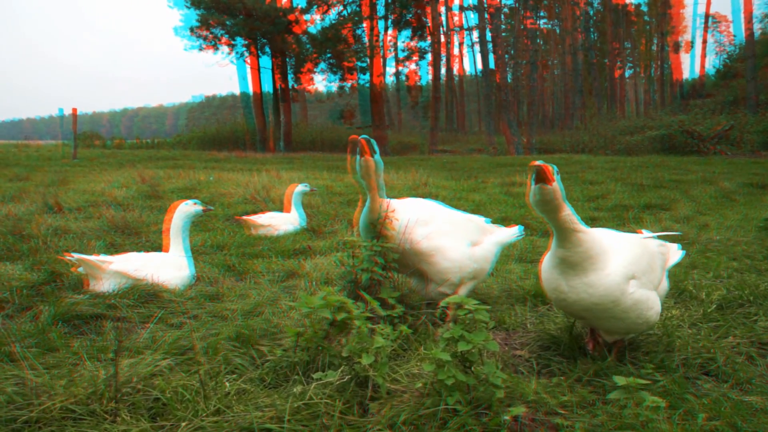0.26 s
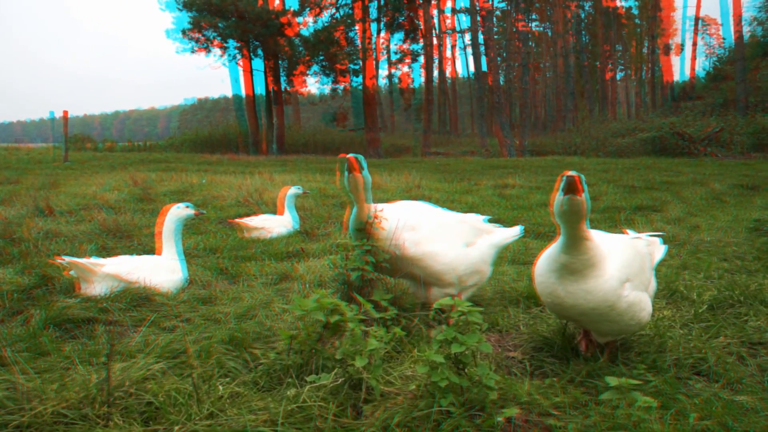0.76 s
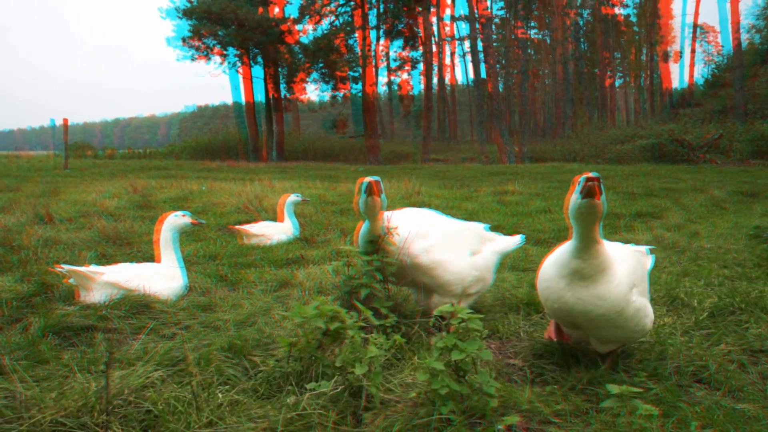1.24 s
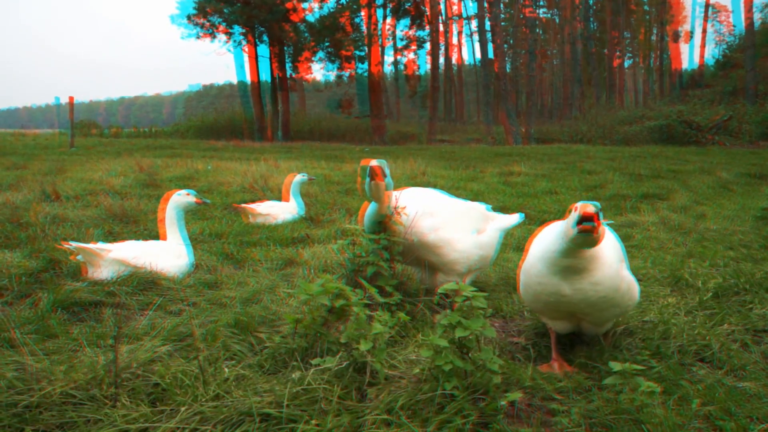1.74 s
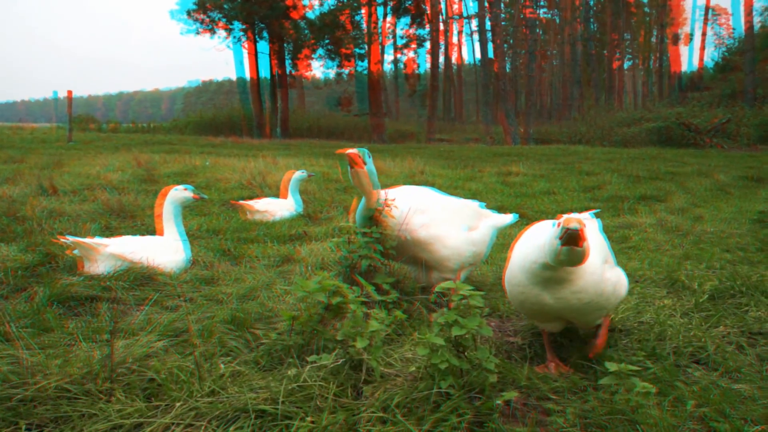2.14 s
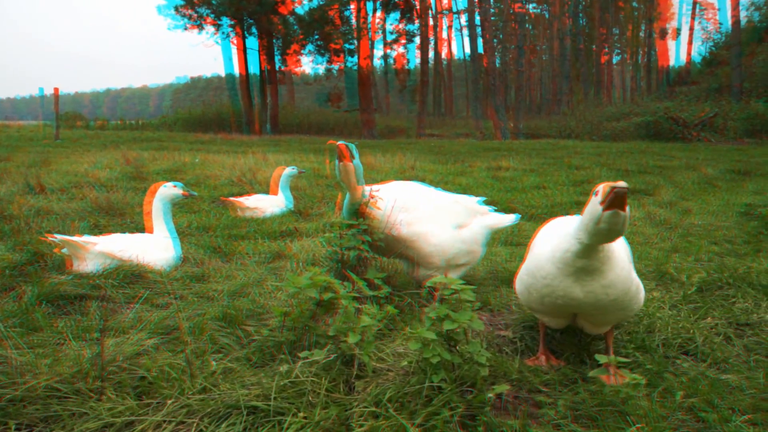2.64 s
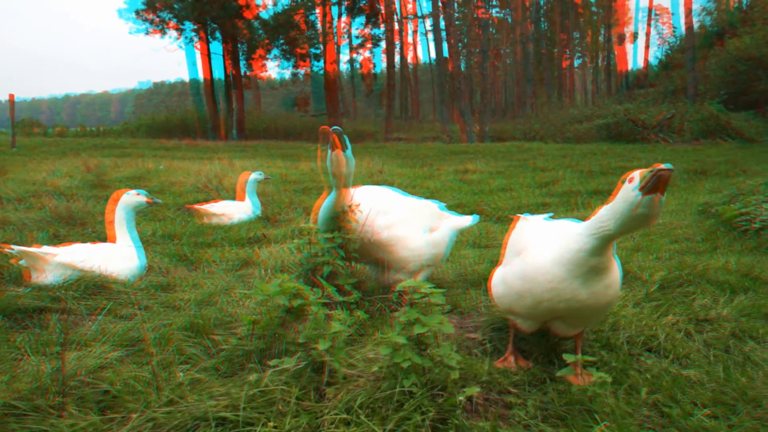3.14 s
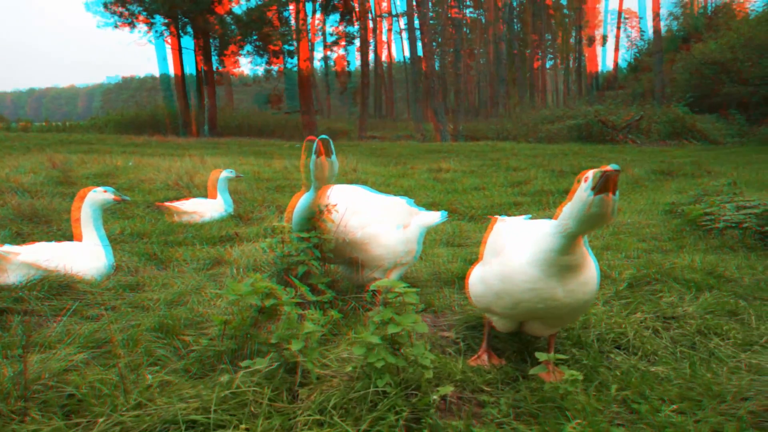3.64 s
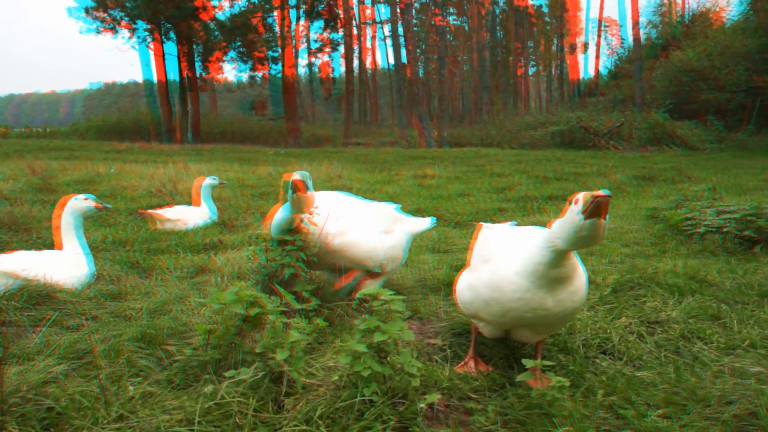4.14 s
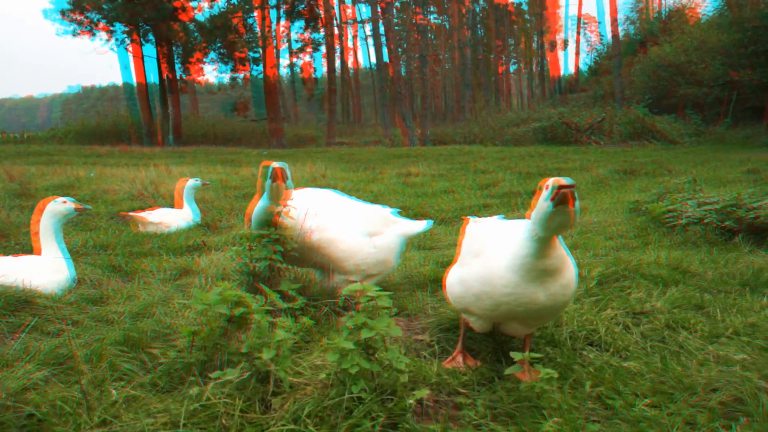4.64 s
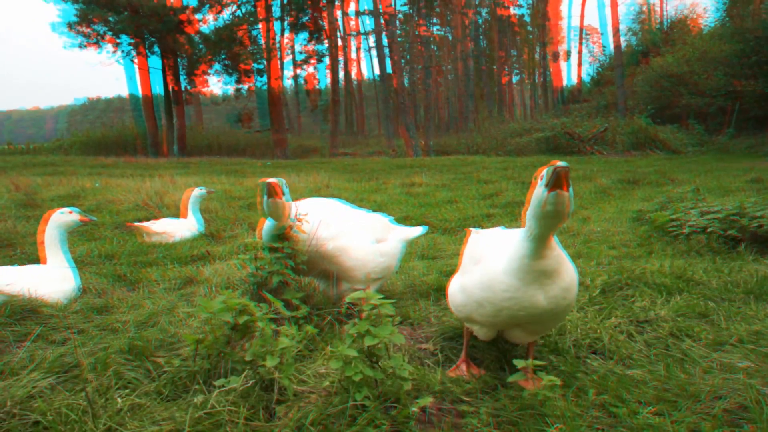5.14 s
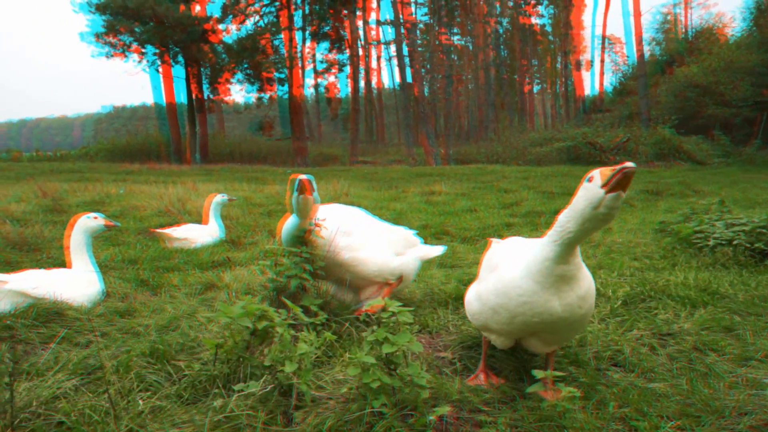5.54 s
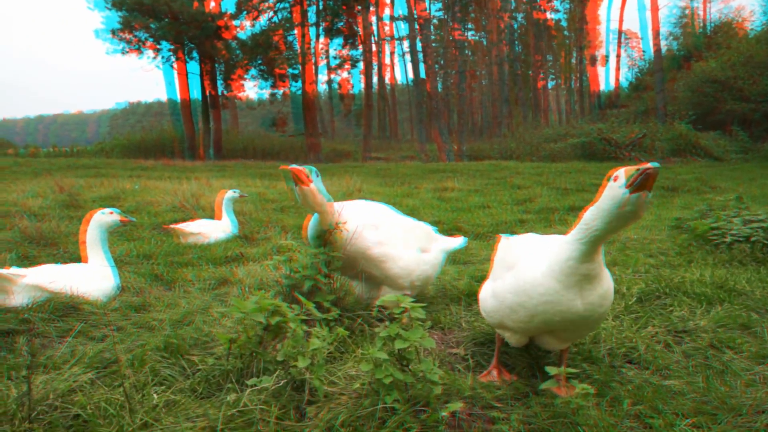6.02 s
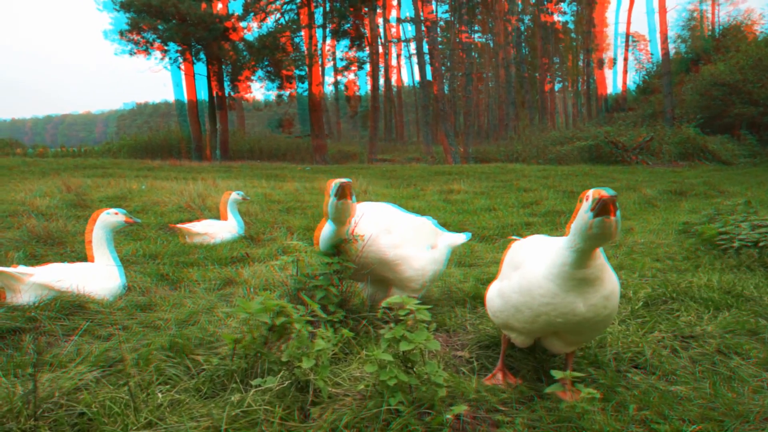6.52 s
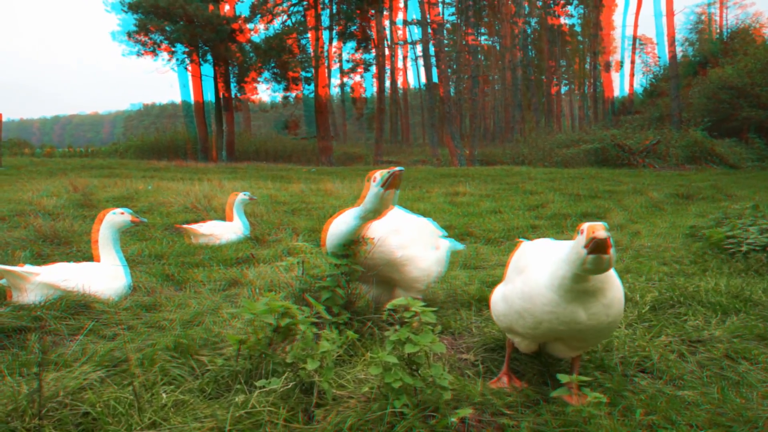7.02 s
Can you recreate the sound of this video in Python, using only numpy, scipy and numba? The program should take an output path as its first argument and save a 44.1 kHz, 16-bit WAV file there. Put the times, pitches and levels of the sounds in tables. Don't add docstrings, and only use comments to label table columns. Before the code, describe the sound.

A lone bark, a quiet spell with faint far geese, then rapid raspy goose cackles, a lull cut to silence, and more honking.

```python
import sys
import numpy as np
from scipy import signal
from scipy.fft import rfft, irfft, next_fast_len
from scipy.io import wavfile
from scipy.ndimage import uniform_filter1d
from numba import njit

SR = 44100
rng = np.random.default_rng(int(sys.argv[2]) if len(sys.argv) > 2 else 0)


def amplitude_ratio(level_db):
    exponent = np.asarray(level_db, float) / 20
    return 10 ** exponent


def to_wav(sig):
    pcm = np.clip(np.atleast_2d(sig), -1, 1) * 32767
    pcm = np.round(pcm).astype(np.int16)
    wavfile.write(sys.argv[1], SR, pcm.T)


N = 320607

# frequency in Hz, level in dB.
TRUMPET_COLOUR = [(350, -20.5), (950, -4), (1500, -14), (2000, -20.5), (2800, -19), (3400, -28.5),
                  (4100, -22.5), (5000, -37), (12000, -58.5)]


def filtered(x, order, hz, kind="low", rate=SR):
    return signal.sosfilt(signal.butter(order, hz, kind, fs=rate, output="sos"), x)


def tone(x, points):
    size = next_fast_len(N)
    hz, db = np.transpose(points)
    bins_hz = np.arange(size // 2 + 1) * SR / size
    gain_db = np.interp(np.log(bins_hz + 1), np.log(hz), db)
    return irfft(rfft(x, size) * amplitude_ratio(gain_db), size)[..., :N]


def in_time(rows):
    s, *columns = np.transpose(rows)
    return [np.interp(np.arange(N) / SR, np.maximum.accumulate(s), c) for c in columns]


def flutter(hz):
    slow = filtered(rng.standard_normal(N), 2, hz)
    return slow / slow.std()


def pan(x, db):
    return np.array([x * amplitude_ratio(db / 2), x * amplitude_ratio(-db / 2)])


@njit
def throat(source, modes, opening, reach_hz, strength, stiff):
    out = np.zeros(len(source))
    for k in range(len(modes)):
        hz, width_hz, gain = modes[k]
        r, y1, y2, c = np.exp(-np.pi * width_hz / SR), 0., 0., 0.
        shift = min(1., reach_hz / hz) ** stiff * (hz > 600)
        for i in range(2, len(source)):
            if i % 32 == 2:
                c = 2 * r * np.cos(2 * np.pi * hz * opening[i] ** shift / SR)
            y1, y2 = (1 - r * r) / 2 * (source[i] - source[i - 2]) + c * y1 - r * r * y2, y1
            out[i] += (-1) ** k * gain * strength[k, i // 32] * y1
    return out


def voice(level_db, pitch, opening, rough, modes, hum_db, hiss, cut_hz, airy=0.28, steep=0.14, stiff=0.96):
    cycles = np.cumsum(pitch) / SR
    uneven = cycles + .05 * rough * flutter(150)
    slaps = np.diff(np.floor(np.maximum.accumulate(uneven)), prepend=0)
    slaps = slaps * amplitude_ratio(4 * rough * flutter(200))
    slaps = signal.lfilter([.55], [1, -.45], slaps)

    breath = rng.standard_normal(N) * np.exp(-3.0 * (uneven % 1))
    jet = filtered(breath, 2, 3600, "high")
    jet *= amplitude_ratio(0.76 * np.clip(level_db + 22.5, -25, 5) + 1.5 * flutter(20))
    jet *= amplitude_ratio(1.2 * flutter(900))
    source = slaps + airy * rough * breath + hiss * jet

    rows = np.array([(hz, width, amplitude_ratio(db)) for hz, width, db in modes])
    on = level_db > -79
    turning = filtered(rng.standard_normal((len(rows), N // 32 + 1)), 2, 12, rate=SR / 32)
    strength = amplitude_ratio(1.8 * turning / turning.std())
    sound = throat(source[on], rows, opening[on], 1200.0, strength, stiff)
    sound = filtered(sound, 6, cut_hz, "high")

    dull = filtered(sound, 2, 3200)
    sound = dull + (sound - dull) * amplitude_ratio(0.6 * np.clip(level_db[on] + 23, -22, 0))
    sound /= np.sqrt(abs(uniform_filter1d(sound ** 2, size=900)) + 1e-9)
    sound += steep * filtered(sound ** 2, 4, 1500, "high")

    body = amplitude_ratio(hum_db) * np.sin(2 * np.pi * cycles)
    body[on] += sound
    return amplitude_ratio(level_db) * body


def cackle():
    # start in seconds, length in seconds, level in dB, top pitch in Hz, chest ring in dB.
    syllables = [(1.875, 0.13, -26.5, 159.9, -3), (2.026, 0.08, -25.5, 162.5, -2),
                 (2.168, 0.096, -23.5, 157.6, -3.5), (2.317, 0.097, -23.5, 160.4, -3),
                 (2.434, 0.1, -22.5, 162, -2.5), (2.546, .12, -22.5, 164.9, -1),
                 (2.676, .12, -23.5, 164.2, -0.5), (2.842, 0.09, -22.5, 158.2, -3),
                 (3.082, 0.083, -25, 161.4, -4), (4.975, 0.12, -20.5, 162.1, -13),
                 (5.167, .12, -23.5, 159.8, 0), (5.285, .14, -22.5, 163.8, -0.7),
                 (5.419, .15, -24, 162.8, -1.5), (5.558, 0.13, -24, 164, -0.2),
                 (5.699, .144, -23.5, 161.5, -1.8), (5.835, .12, -23.5, 162.4, -0.5),
                 (6.103, 0.1, -22, 162.6, -0.8), (6.245, 0.09, -24, 158.3, -1.1),
                 (6.358, 0.08, -24, 159.8, -2), (6.752, .09, -23.5, 165, -3.5),
                 (6.941, .063, -23.5, 159.3, -3.5)]
    # share of length, level in dB, bill opening as resonance factor.
    course = [(-.1, -30, .66), (0.018, -3.5, 0.758), (.11, -1, 0.87), (.25, 2, 0.994), (0.419, 2, 1.0095),
              (0.65, 1.5, 1.015), (.88, -2.5, .88), (1.02, -9.5, .8), (1.14, -67, 0.3)]
    # share of length, level in dB.
    chest_course = [(0, 3.5), (.35, 1), (.6, -3), (.9, 4.5)]
    # frequency in Hz, width in Hz, level in dB.
    bent_throat = [(480, 96, -3.5), (1110, 74, 8), (1897, 15, 3.5), (2201, 81, -4.5), (2970, 33, -2.5),
                   (3310, 25, -9.5), (4286, 150, -9), (5150, 360, -16.5), (6400, 150, -14.5),
                   (7970, 440, -22), (8760, 63, -29), (10300, 1700, -35.5), (12100, 770, -39.5),
                   (13930, 660, -39)]
    # frequency in Hz, width in Hz, level in dB.
    stretched_throat = [(473.5, 68, -2.5), (1100, 85, 9), (1593.5, 31, -5), (2202, 75, 1.5),
                        (2810, 26, 1.5), (3270, 48, -8.5), (4123, 61, -5.5), (4450, 28, -5),
                        (4770, 95, -11.5), (6250, 76, -14), (7890, 85, -14.5), (9780, 320, -54),
                        (12000, 420, -52), (14200, 640, -56)]
    # frequency in Hz, level difference in dB.
    side_colour = [(60, 0.5), (130, -2), (290, -4.5), (640, -8), (1410, -7.5), (3100, -9.5), (6820, 3.5),
                   (11500, -11)]
    slack_hz = 157.1
    neck_up_s, neck_down_s = 5.15, 6.6

    rows = []
    full_course = [(-.12, -94.5, 0.82), *course, (1.16, -97, .7)]
    for k, (s, length, db, top, ring_db) in enumerate(syllables):
        before = sum(syllables[k - 1][:2]) if k else 0
        after = syllables[k + 1][0] if k + 1 < len(syllables) else N / SR
        bill = (top / 161.5) ** 0.77
        for u, step_db, opening in full_course:
            at = s + u * length
            if before + .01 < at < after - .01 or 0 < u < 1:
                pitch = np.interp(u, [0, .2, .4, .85], [.94 * top, 1.01 * top, top, slack_hz])
                rough = np.interp(u, [.08, .24, .78, 1.05], [.7, .1, .12, .55])
                chest_now_db = ring_db + np.interp(u, *np.transpose(chest_course))
                rows.append((at, db + step_db, pitch, opening * bill, rough, chest_now_db))
    level_db, *controls, chest_db = in_time(sorted(rows))

    middle_s, half_s = (neck_up_s + neck_down_s) / 2, (neck_down_s - neck_up_s) / 2
    stretched = np.abs(np.arange(N) / SR - middle_s) < half_s
    sound = np.zeros(N)
    for held, modes, stiff in [(~stretched, bent_throat, 1.05), (stretched, stretched_throat, 2.2)]:
        sound += voice(np.where(held, level_db, -120), *controls, modes, hum_db=-12.0, hiss=0.093,
                       cut_hz=435, airy=.3, steep=0.21, stiff=stiff)
    chest_band = signal.butter(2, (378, 560), "band", fs=SR, output="sos")
    sound += (amplitude_ratio(chest_db) - 1) * signal.sosfiltfilt(chest_band, sound)
    sound = signal.lfilter(*signal.iirnotch(641, 16, fs=SR), sound)
    return np.array([tone(sound, [(hz, side * db / 2) for hz, db in side_colour]) for side in (1, -1)])


def drone():
    # start in seconds, length in seconds, level in dB, pitch in Hz.
    pushes_of_air = [(0.172, 0.03, -40.5, 150), (1.457, 0.019, -26.5, 135.2), (1.76, 0.075, -21.5, 134.7),
                     (1.835, 0.064, -20, 136.7), (1.93, 0.066, -22, 135.8), (1.992, 0.1, -23, 134.1),
                     (2.14, 0.068, -23, 134.4), (2.967, 0.033, -20.5, 131.8), (3.008, 0.08, -21, 135.6),
                     (3.085, 0.089, -25, 133.6), (5.095, 0.058, -25.5, 134.9), (5.17, 0.069, -23, 135),
                     (5.29, 0.051, -27, 138), (5.4, 0.11, -23.5, 135.3), (5.545, 0.1, -23, 138),
                     (5.67, 0.067, -23.5, 133.8), (5.765, .11, -24, 140.2), (5.955, 0.038, -26, 133.7),
                     (6.605, 0.056, -23, 136.3), (6.678, 0.079, -19, 139.3), (6.78, 0.015, -20.5, 140.2),
                     (6.84, 0.0995, -21.5, 137.4)]
    # frequency in Hz, width in Hz, level in dB.
    drone_throat = [(411.3, 510, -10.5), (686, 70, 0), (821, 70, 7), (957, 83, 0), (1521, 80, -3.5),
                    (1820, 50, -4.5), (2114, 42, -1), (2586, 33, -5), (3584, 170, -15), (4790, 61, -18),
                    (5430, 62, -25.5), (6560, 3900, -29), (11200, 2600, -35)]
    rise_s, edge_db, sag = .015, -3.5, 0.022
    gap_s, onset_s, release_s = .06, .025, 0.032

    rows = []
    for k, (s, length, db, pitch) in enumerate(pushes_of_air):
        high, low, end = pitch * (1 + sag), pitch * (1 - sag), s + length
        if k == 0 or s - sum(pushes_of_air[k - 1][:2]) > gap_s:
            rows += [(s - 1.2 * onset_s, -99, low), (s - onset_s, db - 34.5, low)]
        rows += [(s, db + edge_db, pitch), (s + rise_s, db, high)]
        rows += [(end - rise_s, db, low), (end, db + edge_db, low)]
        if k + 1 == len(pushes_of_air) or pushes_of_air[k + 1][0] - s - length > gap_s:
            rows += [(end + release_s / 2, db - 17.0, low), (end + release_s, db - 37, low),
                     (end + 1.4 * release_s, -99, low)]
    level_db, pitch = in_time(rows)
    rough = np.interp(level_db, [-32, -21], [.6, .16]) * amplitude_ratio(3 * flutter(8))
    opening = 1 + .006 * np.clip(level_db + 20.5, -15, 5) + .012 * flutter(18.0)
    sound = voice(level_db, pitch, opening, rough, drone_throat, hum_db=-13.0, hiss=0.18, cut_hz=408, airy=0.24)
    return pan(sound, db=2.0)


def rasp():
    # start in seconds, length in seconds, level in dB, pitch in Hz, resonance factor.
    halves = [
        (4.826, .05, -28, 203, 1),
        (4.88, .09, -28, 182, 1),
    ]
    # frequency in Hz, width in Hz, level in dB.
    rasp_throat = [(612, 95, -5.5), (1010, 112, 2.5), (1500, 114, 1.5), (1750, 47, 2), (2230, 72, -7.5),
                   (3270, 420, -17), (4200, 380, -19), (7340, 4700, -38.5)]
    (s, first, db, high, _), (broken, second, _, low, _) = halves
    end = broken + second
    level_db, pitch, rough = in_time([
        (s - .01, -99, high, .1), (s, db - 7.5, 0.9 * high, .1),
        (s + 0.011, db, .98 * high, .06), (s + first, db, 1.02 * high, .08),
        (broken, db - 1, .97 * low, .2), (end, db, low, .14), (end + .015, -99, low, .22)])
    sound = voice(level_db, pitch, np.ones(N), rough, rasp_throat, hum_db=-16.5, hiss=0.52, cut_hz=490, airy=0.64)
    return pan(sound, db=-3.5)


def short_pushes(calls, modes, course, rough, hum_db, side_db, widen=0):
    rest_hz, settle = 161.1, 0.41
    rows = []
    for s, length, db, start, opening in calls:
        for u, step_db in course:
            pitch = start + u * settle * (rest_hz - start)
            bill = opening * (1 + widen * (np.clip(u, 0, 1) - .5))
            rows.append((s + u * length, db + step_db, pitch, bill))
    level_db, pitch, opening = in_time(rows)
    return pan(voice(level_db, pitch, opening, rough, modes, hum_db=hum_db, hiss=.15, cut_hz=360), side_db)


def grunts():
    # start in seconds, length in seconds, level in dB, start pitch in Hz, resonance factor.
    calls = [(2.292, .04, -27, 190, .75), (2.408, .036, -27, 190, .78), (2.942, .025, -35, 145, 1.6),
             (5.1, .07, -29, 145, 1.01), (5.385, .04, -28, 170, .9), (4.976, .016, -22, 200, 1.05),
             (6.062, .036, -34, 165, 1.1), (6.098, .016, -25, 165, 1.1), (6.335, .03, -28, 170, .9),
             (6.503, .02, -35, 170, .8), (6.544, .031, -26, 180, 1.32), (7.19, .018, -35, 145, 1.05),
             (7.264, .012, -25, 200, 1.2)]
    # frequency in Hz, width in Hz, level in dB.
    grunt_throat = [(690, 100, 4.5), (1180, 160, -2), (1840, 170, -2.5), (2843, 260, -6), (4074, 390, -9.5),
                    (7700, 1600, -45.5)]
    # share of length, level in dB.
    course = [(-.15, -70.5), (-.1, -28.5), (0.079, -4.5), (0.399, 2), (.85, -1.5), (1.15, -41),
              (1.199, -96.5)]
    return short_pushes(calls, grunt_throat, course, rough=0.66, hum_db=-20.0, side_db=2.5)


def creaks():
    # start in seconds, length in seconds, level in dB, start pitch in Hz, resonance factor.
    calls = [
        (1.703, 0.058, -29.5, 105.6, 1.05),
        (7.104, 0.051, -30, 122.2, 1),
    ]
    # frequency in Hz, width in Hz, level in dB.
    creak_throat = [(670, 110, 7.5), (1480, 90, 3), (1950, 120, -10), (2780, 74, 2), (3660, 250, -18.5)]
    # share of length, level in dB.
    course = [(-.04, -72), (0, -16.5), (.45, -6.5), (0.951, 2.5), (1.1, -22.5), (1.2, -94)]
    return short_pushes(calls, creak_throat, course, rough=0.22, hum_db=-18.0, side_db=5.0)


def bark():
    # start in seconds, length in seconds, level in dB, start pitch in Hz, resonance factor.
    calls = [
        (.16, 0.045, -25.5, 340.6, 0.9),
    ]
    # frequency in Hz, width in Hz, level in dB.
    bark_throat = [(640, 190, 2), (1460, 620, -9), (1950, 160, -4), (2500, 170, 0.5), (3840, 140, -1.5),
                   (5600, 3000, -17), (8400, 3500, -19), (11500, 1500, -26)]
    # share of length, level in dB.
    course = [(-.25, -74), (-.15, -26.5), (.15, -10), (.42, 1.5), (.75, 1.5), (1.05, -17.5), (1.3, -33),
              (1.348, -92)]
    return short_pushes(calls, bark_throat, course, rough=0.7, hum_db=-31.0, side_db=1.9, widen=0.5)


def note(s, length):
    at = np.arange(max(round(s * SR), 0), min(round((s + length) * SR), N))
    return at, (at / SR - s) / length


def clear_notes(notes, colour, tilt_db, arch, hoarse, side_db, full, cut_hz, grow=.93, rise=.23, smear=1):
    out, wobble = np.zeros(N), flutter(255)
    colour_hz, colour_db = np.transpose(colour)
    for s, length, db, top, end in notes:
        at, u = note(s, length)
        uneven_db = rng.normal(0, 1.1, (40, 1))
        climb = (1 - arch) * top * (1 - u / rise) ** 2
        fall = (top - end) * ((u - .4) / 0.42) ** 2
        pitch = (top - np.where(u < max(.4, rise), climb, fall)) * (1 + .03 * hoarse * wobble[at])
        orders = np.arange(1, 13000 // top)[:, None]
        swell = np.interp(u, [0, *full, 1], [.03, 0.8, 0.9 * grow, 0.024])
        tilt_now_db = tilt_db - 5 * (1 - swell)
        gain_db = np.interp(orders * pitch, colour_hz, colour_db) + tilt_now_db * np.log2(orders)
        gain_db = gain_db + uneven_db[:len(orders)] * np.minimum(orders - 1, 2)
        phase = 2 * np.pi * orders * np.cumsum(pitch) / SR + smear * orders ** 2 + np.pi / 2
        wave = np.sum(amplitude_ratio(gain_db) * np.sin(phase), axis=0)
        out[at] += wave / wave.std() * swell * amplitude_ratio(db)
    out = out * (1 + hoarse * flutter(1200)) * amplitude_ratio(0.67 * hoarse * flutter(22.97)) + 1e-9 * wobble
    return pan(filtered(out, 6, cut_hz, "high"), side_db)


def trumpets():
    # start in seconds, length in seconds, level in dB, top pitch in Hz, end pitch in Hz.
    calls = [
        (-.035, .08, -36, 550, 490),
        (7.148, .09, -30, 488, 462),
    ]
    return clear_notes(calls, TRUMPET_COLOUR, tilt_db=0.7, arch=0.84, hoarse=0.17, side_db=4.5,
                       full=(.2, .75), cut_hz=270)


def honk():
    # start in seconds, length in seconds, level in dB, top pitch in Hz, end pitch in Hz.
    calls = [
        (1.522, 0.086, -25, 425, 388.6),
    ]
    # frequency in Hz, level in dB.
    colour = [(400, -9), (850, -1), (1280, -18), (1700, -20), (2100, -13), (2600, -32), (3400, -22),
              (4300, -33.5), (12000, -46)]
    return clear_notes(calls, colour, tilt_db=0.0, arch=0.93, hoarse=0.11, side_db=2.5,
                       full=(.25, .78), cut_hz=256, grow=1.12)


def yelp():
    # start in seconds, length in seconds, level in dB, top pitch in Hz, end pitch in Hz.
    calls = [
        (6.504, 0.0513, -21.5, 823, 806.6),
    ]
    # frequency in Hz, level in dB.
    colour = [(780, -2), (1600, -3.5), (2400, -3), (3200, -6.5), (4000, -3), (5000, -10.5), (8000, -16),
              (13000, -38)]
    return clear_notes(calls, colour, tilt_db=-.7, arch=.83, hoarse=.38, side_db=-7,
                       full=(.25, .85), cut_hz=400, rise=.6, smear=.06)


def squeaks():
    # start in seconds, length in seconds, level in dB, top pitch in Hz, end pitch in Hz.
    calls = [
        (1.742, .022, -28, 2100, 2060),
        (2.944, .018, -31, 2050, 2000),
        (3.011, .072, -27, 2070, 1960),
        (3.375, .03, -62, 1680, 1650),
        (4.79, .03, -46, 960, 940),
        (4.795, .03, -52, 1900, 1880),
        (6.056, .036, -22, 2050, 2000),
        (6.318, .025, -22, 2090, 2040),
        (7.226, .05, -41, 1235, 1210),
    ]
    return clear_notes(calls, TRUMPET_COLOUR, tilt_db=-15, arch=1.03, hoarse=.28, side_db=.8,
                       full=(.15, .5), cut_hz=600)


def far_geese():
    # start in seconds, length in seconds, level in dB, top pitch in Hz, end pitch in Hz.
    calls = [(.405, 0.13, -59, 1213, 1230), (.49, 0.1, -66, 1195, 1150), (.59, 0.1, -69, 1190, 1150),
             (.75, 0.11, -57.5, 1210, 1110), (.825, 0.11, -63, 1100, 1090), (.79, 0.18, -63.5, 1190, 1180),
             (.87, 0.067, -59, 1110, 1080), (.875, 0.13, -66.5, 1232, 1180), (1.12, 0.2, -57, 1217, 1154),
             (1.27, 0.19, -63.5, 1196, 1200)]
    # frequency in Hz, level in dB.
    colour = [(1150, 5.5), (2400, -9), (3600, -16), (4800, -18), (12000, -34)]
    return clear_notes(calls, colour, tilt_db=2, arch=1.02, hoarse=.22, side_db=2, full=(.06, .3), cut_hz=800)


def trees(x, delay_s, t60_s, dull_hz):
    t = np.arange(SR // 2) / SR
    scatter = rng.standard_normal((2, len(t))) * amplitude_ratio(-60 * t / t60_s) * np.clip(t / delay_s, 0, 1) ** 2
    scatter = filtered(scatter, 1, [300, dull_hz], "band")
    return signal.fftconvolve(x, scatter / np.sqrt(np.sum(scatter[0] ** 2)), axes=1)[:, :N]


def steps():
    # start in seconds, peak level
    # in dB, time to die by 60 dB in seconds.
    footfalls = [(0.1294, -43, 0.25), (.132, -50, .04), (.5, -50, 1), (0.692, -53, 0.34),
                 (1.17, -45.5, 0.11), (1.3673, -16, 0.023), (1.4066, -39, 0.1), (1.68, -43, 0.16),
                 (3.8897, -61, 0.05), (3.939, -31, 0.062), (3.9975, -37, 0.13), (4.0676, -45.5, 0.13)]
    # frequency in Hz, level in dB per Hz.
    colour = [(88, -70), (150, -6), (1530, -10.5), (2270, -9.5), (2810, -11.5), (6020, -13.5), (11500, -21),
              (16000, -29)]
    crackle = tone(rng.standard_normal(N) * amplitude_ratio(3.1 * flutter(540)), colour)
    gain = np.zeros(N)
    for s, db, t60 in footfalls:
        at, u = note(s, t60)
        gain[at] += amplitude_ratio(db - 14.5 - 60 * u)
    return pan(gain * crackle / crackle.std(), db=6.0)


def bird():
    # start in seconds, length in seconds, level in dB, start pitch in Hz, end pitch in Hz.
    whistles = [(0.533, 0.02, -73, 6600, 5000), (0.594, 0.016, -72, 4000, 6200),
                (0.608, 0.02, -71, 6200, 4400), (0.66, 0.12, -79, 5900, 6150), (.83, 0.08, -77, 6410, 6600),
                (.925, 0.07, -77, 3700, 4340), (0.963, .05, -69, 7000, 6900),
                (1.08, 0.074, -69, 7000, 6900), (1.183, 0.12, -70, 6930, 6500),
                (1.671, .02, -66, 6000, 5500), (1.688, .022, -66, 5550, 4000),
                (3.27, 0.087, -75, 6610, 6660), (3.42, 0.07, -75, 6570, 6750),
                (3.53, 0.071, -76, 6770, 7120), (3.777, 0.024, -73, 5730, 5930)]
    out, trill = np.zeros(N), flutter(300)
    for s, length, db, start, end in whistles:
        at, u = note(s, length)
        pitch = start + u * (end - start) + 60 * trill[at]
        out[at] += amplitude_ratio(db + 3) * np.sin(np.pi * u) * np.sin(2 * np.pi * np.cumsum(pitch) / SR)
    return pan(out * amplitude_ratio(4.6 * flutter(120)), db=5.0)


def air():
    # time in seconds, level in dB.
    strength = [
        (0, -56),
        (.5, -70.5),
        (1.2, -63.5),
        (3.2, -58.5),
        (3.6, -72),
        (4.05, -60),
        (4.8, -54.5),
        (7.27, -65),
    ]
    # frequency in Hz, level in dB per Hz.
    colour = [(12, -51), (20, -24.5), (102, -14), (250, -13.5), (504, -23.5), (726, -25.5), (790, -24.5),
              (1420, -25.5), (2720, -32), (3210, -32.5), (5630, -34), (6480, -35.5), (16400, -38)]
    mid, side = tone(rng.standard_normal((2, N)), colour)
    gusts_db = 1.2 * flutter(5)
    rumble = filtered(rng.standard_normal(N), 2, [35, 90], "band")
    rustle = np.array([mid + 0.29 * side, mid - 1.2 * side]) / mid.std()
    return amplitude_ratio(-79.5) * rumble / rumble.std() + amplitude_ratio(in_time(strength)[0] + gusts_db) * rustle


def scene():
    geese = cackle() + drone() + rasp() + grunts() + creaks() + bark()
    geese += trumpets() + honk() + yelp() + squeaks() + far_geese()
    echo = amplitude_ratio(-33) * trees(geese, delay_s=0.0036, t60_s=0.41, dull_hz=2520)
    return geese + echo + steps() + bird() + air()


def band_limit(x):
    return signal.sosfilt(signal.butter(12, 16520, fs=SR, output="sos"), x)


def record(dry):
    # time in seconds, gain in dB.
    fader = [
        (0, 5),
        (4.08, 5),
        (4.19, -8.5),
        (4.203, -95),
        (4.778, -88.5),
        (4.79, -5),
        (4.82, 4.5),
        (7.3, 5.5),
    ]
    mid, side = (dry[0] + dry[1]) / 2, (dry[0] - dry[1]) / 2
    side = side + amplitude_ratio(-17) * filtered(mid, 2, [6500, 9800], "band")
    side = filtered(side, 6, 11000)
    dull = filtered(np.array([mid + side, mid - side]), 7, 14300)
    dull = signal.lfilter(*signal.iirnotch(12950, 11, fs=SR), dull)
    dull += amplitude_ratio(-74.5) * filtered(rng.standard_normal(N), 2, 11000, "high")
    rounded = 0.47 * np.tanh(dull * amplitude_ratio(in_time(fader)[0]) / 0.76)
    rounded = signal.sosfilt(signal.cheby2(12, 60, 16600, fs=SR, output="sos"), rounded)
    return band_limit(rounded)


dry = scene()
out = record(dry)
to_wav(out)
```